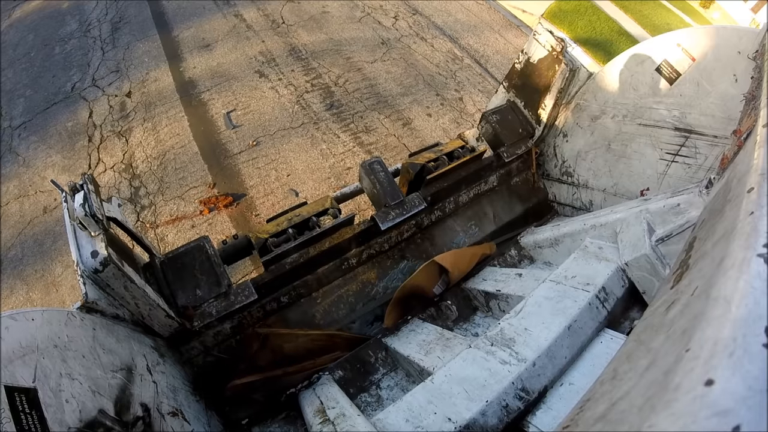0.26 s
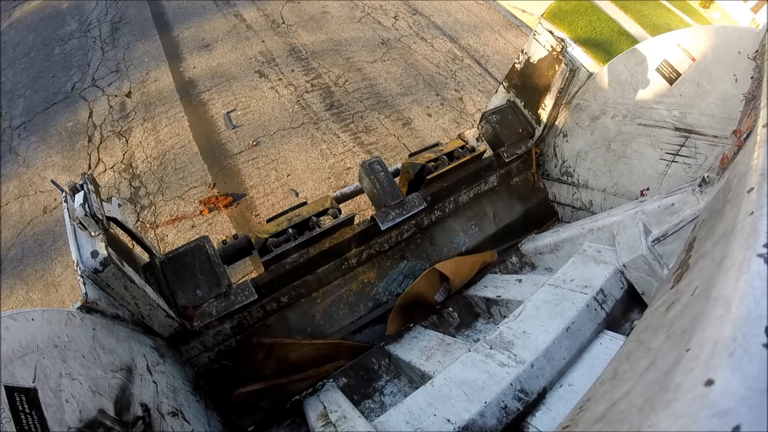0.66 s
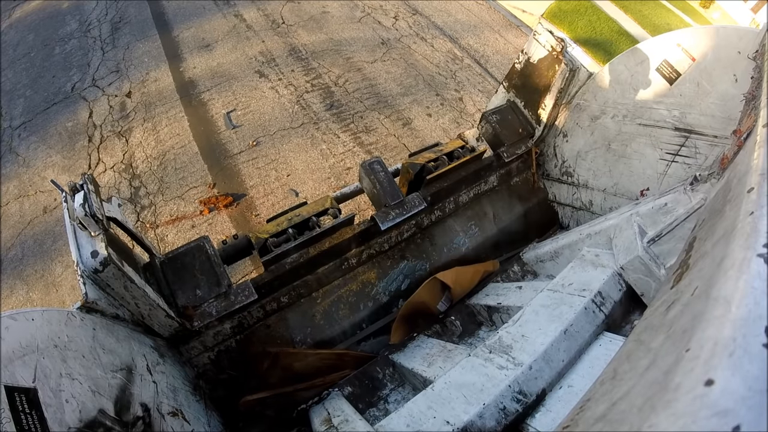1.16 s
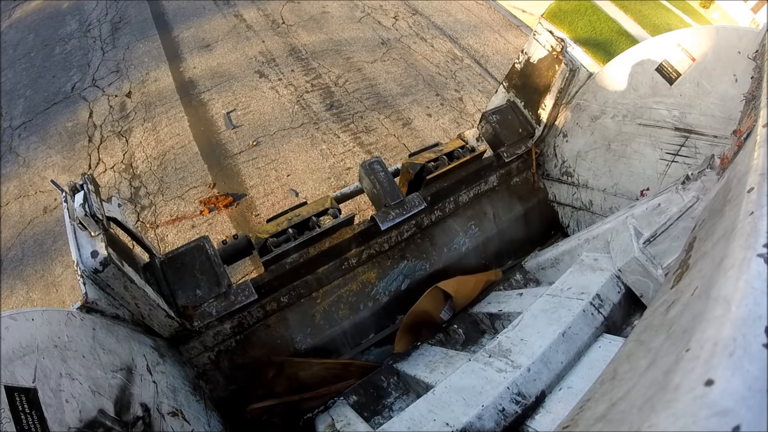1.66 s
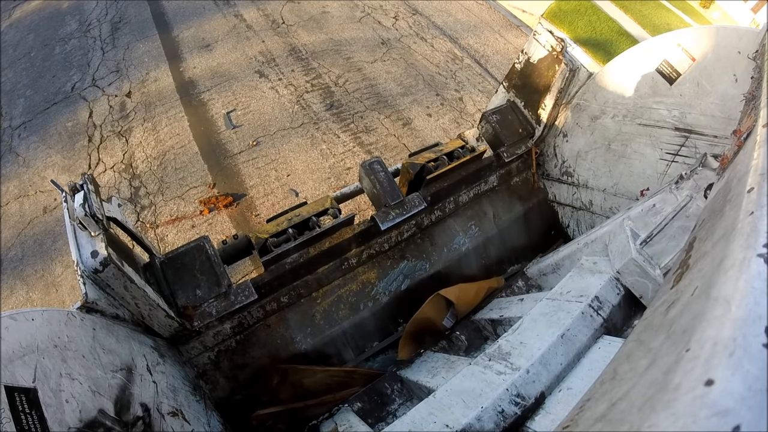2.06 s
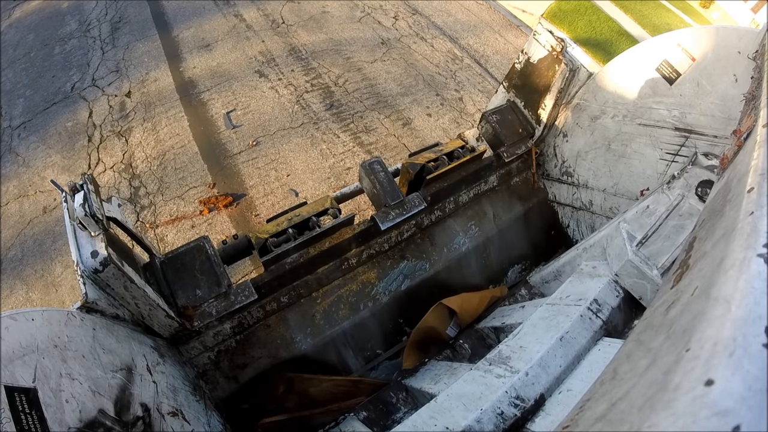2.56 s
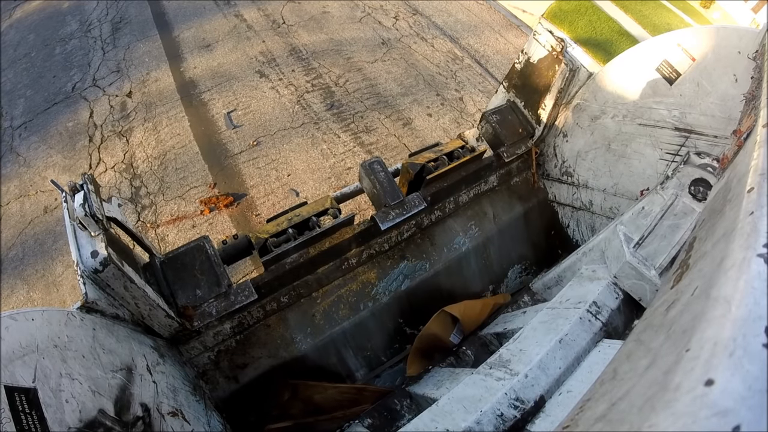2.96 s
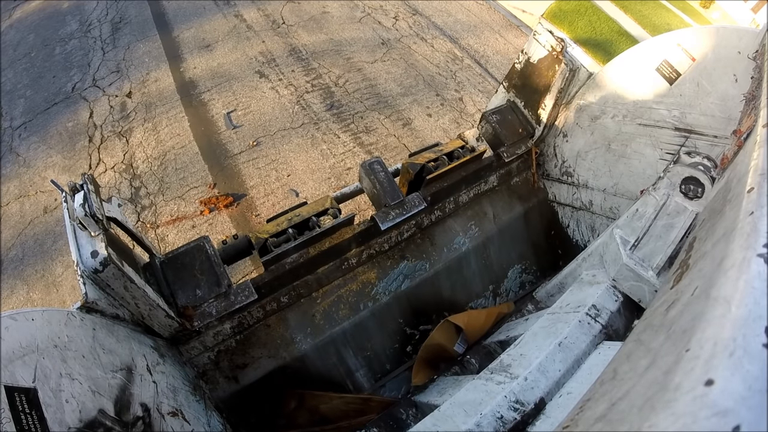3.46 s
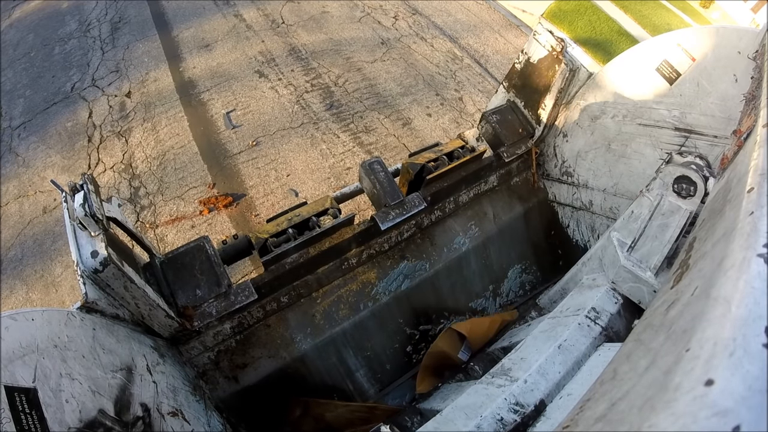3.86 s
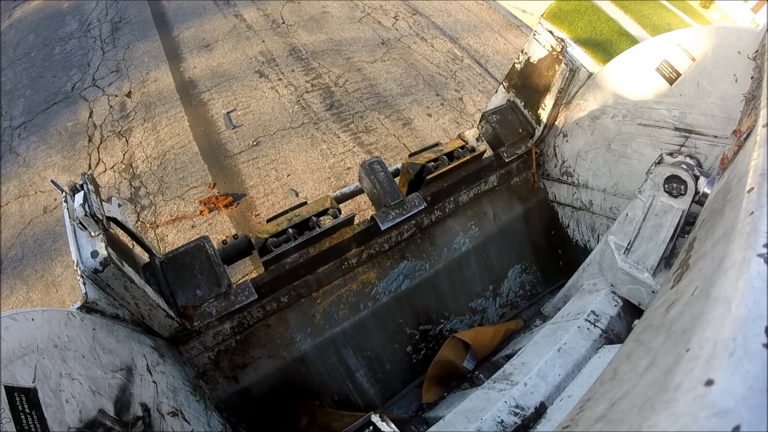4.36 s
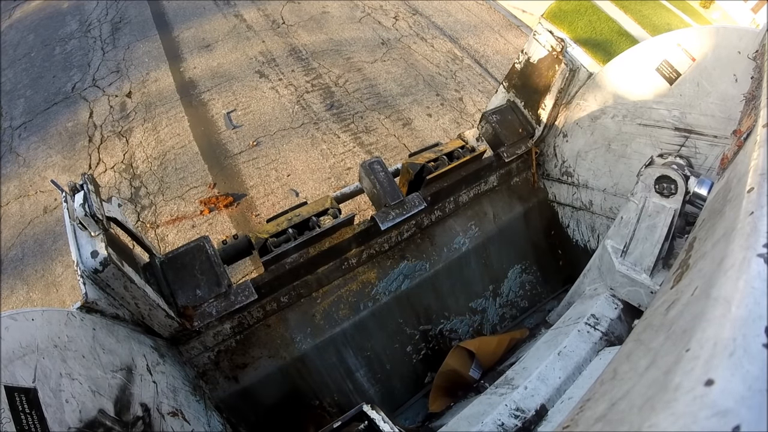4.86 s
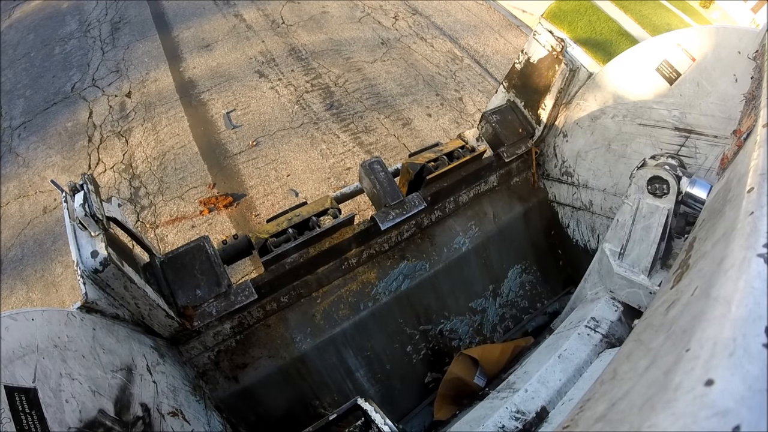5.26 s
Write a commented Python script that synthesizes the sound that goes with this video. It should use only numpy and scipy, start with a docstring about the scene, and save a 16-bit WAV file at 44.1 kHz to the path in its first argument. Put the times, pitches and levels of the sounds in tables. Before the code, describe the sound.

A garbage truck's packer blade drags wood and cardboard through its steel hopper, heard very close in mono. A loud, rough, high metallic whine, centred around 2 to 3 kHz, fills the whole five and a half seconds, gritty with fine crackle. From 0.1 to 1.1 seconds crunches come quickly: bright splinters snap around 0.3, boards crack around 0.4 to 0.8, and a short squeak sounds near 1.07. Crunches then space out, with a low groan around 2.25 and a strong crack and thud at 2.7. More cracking gathers from 3.5 to 3.7, with thudding breaks near 4.1, 4.7 and 4.9, and crunches continuing to the end. Grinding eases briefly around 0.75, 4.2 and 5.4. Beneath it a diesel rumbles, its deep boom swelling near the start, 2.2, 4.9 and 5.3, while a hydraulic pump hums steadily. Short, hard reflections give a metal-box resonance.

```python
"""Loud throughout is the high, rough whine of a steel hopper, rung by the load a packer blade drags across it.
Place: a garbage truck at work; distance and microphone: close, just above the hopper.
Wood and cardboard grind, crack and splinter: random tiny fractures ring through filters, in timed crunches.
A few gliding sines groan and squeak as the load sticks and slips on the steel.
Underneath, a diesel engine rumbles (filtered noise and tones) and a hydraulic pump hums at a steady speed."""
import sys
import numpy as np
from scipy import signal
from scipy.fft import rfft, irfft, next_fast_len
from scipy.io import wavfile
from scipy.ndimage import uniform_filter1d, minimum_filter1d, map_coordinates

SR = 44100
rng = np.random.default_rng(int(sys.argv[2]) if len(sys.argv) > 2 else 0)


def materialize(psi):
    """Save the field psi as 16-bit PCM at rate SR to the path in sys.argv[1].

    A 1-D psi becomes a single channel; in a 2-D psi each row is a channel.
    """
    bounded = np.clip(np.atleast_2d(psi).T, -1, 1)
    quanta = np.round(bounded * 32767).astype(np.int16)
    wavfile.write(sys.argv[1], SR, quanta)


N = 243431

# Small slips of the load: mean rate (1/s), centre level and half range (dB), length (s)
SLIPS_PER_S, SLIP_DB, SLIP_SCATTER_DB, SLIP_S = 8, -23, 0.5, 0.012


def small_slips(count=80):
    """Minor slips at uneven random intervals, as rows of (t/s, length/s, level/dB)."""
    gap, size = rng.random((count, 2)).T
    times = np.cumsum(2 * gap) / SLIPS_PER_S
    levels_db = SLIP_DB + SLIP_SCATTER_DB * (2 * size - 1)
    return [(s, SLIP_S, db) for s, db in zip(times, levels_db) if s < N / SR]


# How hard the blade drags the load over the hopper floor: t/s, grinding level/dB before trims
DRAG = [(0, -21), (.36, -18.5), (.75, -22), (1.8, -19), (2.45, -19), (3.0, -18.5), (4.0, -18),
        (4.22, -21.5), (4.5, -18), (5.25, -18), (5.4, -21.5)]
# The load gives way: t/s, length/s, then level/dB before layer gains of
# ringing steel, cracking wood, tearing fibres
CRUNCHES = [(0.107, 0.016, -14, -36, -40), (0.237, .06, -16, -26, -30.5), (0.315, .045, -16, -24, -23),
            (0.382, 0.03, -11.5, -32, -16), (0.423, 0.016, -21, -10.5, -13.5),
            (0.528, 0.088, -15, -11.5, -24.5), (0.748, 0.022, -39, -13.5, -31.5),
            (0.824, 0.017, -21, -11.5, -32.5), (0.985, 0.026, -15, -32, -31), (1.064, 0.029, -13, -15, -42),
            (1.341, 0.024, -13, -15, -27.5), (1.649, 0.021, -15.5, -34, -45),
            (1.829, 0.028, -14.5, -17, -40), (2.013, .04, -15.5, -31, -45), (2.084, 0.053, -14, -22.5, -29),
            (2.239, 0.044, -16.5, -32, -42.5), (2.316, 0.025, -16.5, -33, -27),
            (2.679, 0.018, -8.5, -13.5, -24.5), (2.953, 0.023, -10, -27, -38), (2.99, 0.024, -14, -32, -30),
            (3.1, .008, -11.5, -31, -42.5), (3.349, 0.0096, -27, -30, -21.5),
            (3.531, 0.029, -13, -15.5, -24.5), (3.587, 0.03, -16, -20.5, -25),
            (3.684, .02, -21.5, -8, -32.5), (3.716, 0.044, -15.5, -25, -32.5),
            (4.111, 0.044, -15, -16, -29), (4.322, .022, -13.5, -34, -23), (4.683, 0.047, -15, -10, -29.5),
            (4.86, 0.039, -16.5, -24, -39), (5.068, 0.018, -14.5, -34, -30),
            (5.135, 0.021, -13, -27, -33.5), (5.179, 0.039, -16, -28, -31), (5.43, .07, -14.5, -16, -31)]
# Resonances of the steel hopper: f/Hz, width/Hz, relative level/dB
HOPPER_MODES = [(850, 36, -18.5), (1030, 62, -25), (1521, 274, -19), (1863, 150, -14.5), (2305, 227, -9.5),
                (2432, 74, -7), (2695, 140, 0.5), (2840, 120, -3.5), (3000, 50, -6.5), (3065, 20, -10),
                (3197, 70, -15), (3608, 30, -14.5), (3752, 103, -19), (4090, 227, -25), (4980, 67, -37.5),
                (5840, 43, -30.5), (6170, 234, -34), (8250, 230, -46.5)]
# Colour of the fine crackle: f/Hz, relative level/dB
CRACKLE_SPECTRUM = [(3000, 6), (5200, 3), (6300, 10.5), (7500, -2.5), (8600, 4.5), (9800, -14.5),
                    (13000, -11), (14000, -23), (15000, -8)]
# Crackle level against the drag curve, and its random swing (dB)
CRACKLE_DB, CRACKLE_SWING_DB = -33, 4.5


def grinding(slips):
    """Dense stick-slip rings the hopper, harder in every crunch and slip; fine crackle rides on top."""
    grind_db, = curves(DRAG)
    sliding = amp(grind_db - 0.23 + 1.08 * wobble(55))
    rows = [(s, length, steel_db) for s, length, steel_db, _, _ in CRUNCHES] + slips
    judders = runs(rows, t60=0.084, fade_db=2.5, attack=0.006)

    ringing = ring(grains(rate=3500, spread_db=3), peaks(HOPPER_MODES, steep=1.703))
    ringing = walls(ringing, t60=0.17, wet_db=-9.5)
    ringing = even(patchy(ringing, depth_db=2), window=0.023)
    steel = np.hypot(sliding, judders) * ringing  # powers add

    crackle_gain = amp(grind_db + CRACKLE_DB + CRACKLE_SWING_DB * wobble(35))
    crackle = crackle_gain * ring(grains(rate=3200, spread_db=9.0), slope(CRACKLE_SPECTRUM))
    return steel + patchy(walls(crackle, t60=0.049, wet_db=-1.5), depth_db=4)


# Colour of cracking wood: f/Hz, relative level/dB
WOOD_SPECTRUM = [(150, -18), (500, 0), (640, -16), (850, 3), (1100, -5.5), (1450, 3.5), (2000, -0.5),
                 (3500, -4.5), (5000, -32), (12000, -56)]
# Boards thud against the blade and shake the body: t/s, length/s, level/dB before layer gains
THUDS = [(0.3, 0.023, -24), (0.42, 0.029, -33), (0.575, 0.042, -25), (0.829, .01, -21.5),
         (2.68, 0.022, -24), (3.54, 0.043, -25.5), (4.12, 0.065, -24), (4.88, .02, -25)]
# Colour of the thuds: f/Hz, relative level/dB
THUD_SPECTRUM = [(80, -30), (200, 8), (300, -2), (440, -2.5), (560, -11), (800, -22), (2000, -61)]


def breaking():
    """Boards crack softly under the drag and in a quick run at each crunch; some thud against the blade."""
    grind_db, = curves(DRAG)
    rows = [(s, length, wood_db) for s, length, _, wood_db, _ in CRUNCHES]
    cracks = runs(rows, t60=0.078, fade_db=6, attack=0.006)
    wood = ring(grains(rate=1700, spread_db=4.5), slope(WOOD_SPECTRUM))
    wood = even(walls(wood, t60=0.14, wet_db=-2.0), window=0.0066)
    cracking = np.hypot(amp(-10.5) * cracks, amp(grind_db - 17)) * wood

    thuds = runs(THUDS, t60=0.048, fade_db=12, attack=0.0019)
    blade = even(ring(grains(rate=1100, spread_db=19.0), slope(THUD_SPECTRUM)), window=0.012)
    return cracking + amp(-8.5) * thuds * blade


# Colour of tearing fibres: f/Hz, relative level/dB
FIBRE_SPECTRUM = [(1500, -25), (4000, 0), (5200, -3), (6400, 0), (7500, -5), (8600, -6), (10000, -13),
                  (13000, -16), (15000, -23)]
# Dry splinters snap off sharply: t/s, level/dB before the layer gain
SNAPS = [(0.318, -24), (0.338, -17.5), (0.555, -31), (2.315, -33.5), (3.534, -32)]
# Colour of the snaps: f/Hz, relative level/dB
SNAP_SPECTRUM = [(4000, -32), (8000, 10), (10500, 1.5), (13000, 2), (15000, -12)]
# Fibres let go unevenly within a tear: swing (dB), random knots a second
TEAR_SWING_DB, TEAR_CHANGES_PER_S = 2.5, 110
# Faint tear against its small slip, and faint snapping against its tear (dB, before layer gains)
SLIP_TEAR_DB, SNAP_IN_TEAR_DB = -13, -27


def splintering(slips):
    """Fibres tear in a ragged bright spray at each crunch, faintly at each slip, and splinters snap off."""
    rows = [(s, length, tear_db) for s, length, _, _, tear_db in CRUNCHES]
    rows += [(s, length, db + SLIP_TEAR_DB) for s, length, db in slips]
    raggedness = amp(TEAR_SWING_DB * wobble(TEAR_CHANGES_PER_S))
    tears = raggedness * runs(rows, t60=0.039, fade_db=6.5, attack=0.0063)
    fibres = ring(grains(rate=3200, spread_db=7.0), slope(FIBRE_SPECTRUM))
    fibres = even(patchy(fibres, depth_db=2), window=0.006)

    snaps = runs([(s, 0.01, db) for s, db in SNAPS], t60=0.035, fade_db=10.5, attack=0.0028)
    snapping = np.hypot(snaps, amp(SNAP_IN_TEAR_DB) * tears)
    shards = even(ring(grains(rate=4500, spread_db=8.5), slope(SNAP_SPECTRUM)), window=0.004)
    spray = amp(-11.0) * tears * fibres + amp(-7.5) * snapping * shards
    return walls(spray, t60=0.17, wet_db=-12.5)


# The load sticks and slips with a groan or a squeak: t/s, length/s, start f/Hz, end f/Hz,
# level/dB before the roughness
SQUEALS = [(0.745, 0.016, 1210, 1160, -28), (0.748, 0.025, 1480, 1450, -29), (0.82, 0.02, 1260, 1390, -27),
           (1.066, 0.042, 892, 850, -25), (1.067, 0.027, 2374, 2420, -11), (1.122, 0.145, 6000, 5900, -41),
           (2.254, 0.07, 457, 417, -25.5), (2.351, 0.095, 380, 324, -34.5), (4.689, .09, 873, 835, -28)]


def squealing():
    """Stick-slip on steel: brief, rough groans and squeaks, each gliding from one pitch to another."""
    t, out = np.arange(N) / SR, np.zeros(N)
    waver = 1 + 0.03 * wobble(700)
    roughness = amp(4.3 * wobble(180))
    for s, length, start_hz, end_hz, db in SQUEALS:
        glide_hz = np.interp(t, [s, s + length], [start_hz, end_hz])
        turns = np.cumsum(glide_hz * waver) / SR
        out += amp(db) * arch(s, length) * np.sin(2 * np.pi * turns)
    return out * roughness


# Pump harmonics: multiple of the pump frequency, level/dB against the hum
PUMP_ORDERS = [(1, -9.5), (2, -11.5), (3, -1), (4, -17.5), (5, -20)]
PUMP_HZ, HUM_DB = 178.25, -31.5


def pump():
    """The hydraulic pump's pressure ripple: a few clean harmonics that waver slightly."""
    turns = np.cumsum(PUMP_HZ * (1 + 0.0015 * wobble(7.6))) / SR
    hum = np.zeros(N)
    for multiple, db in PUMP_ORDERS:
        gain = amp(db + 1.24 * wobble(8))
        hum += gain * np.sin(2 * np.pi * (multiple * turns + rng.random()))
    return amp(HUM_DB) * hum


# Exhaust rumble: t/s, level/dB before a small random swing
EXHAUST = [(0, -29.5), (.6, -29.5), (.68, -33), (.85, -29), (1.12, -33.5), (2.0, -32.5), (2.27, -27),
           (2.55, -32.5), (3.15, -31.5), (3.9, -35.5), (4.7, -32.5), (5.3, -31)]
# Colour of the rumble: f/Hz, relative level/dB
RUMBLE_SPECTRUM = [(20, -31.5), (37, -22), (46, -22.5), (57, -0.5), (68, -3), (80, -6), (91, -4.5),
                   (104, -14.5), (128, -24.5), (200, -27.5), (400, -37), (900, -77)]
# Resonances of the truck body: f/Hz, width/Hz, relative level/dB
BODY_MODES = [(210.4, 21, -6), (334, 27, -27), (464, 34.3, 1), (517.1, 9.6, 4), (828, 53, -7)]
ENGINE_HZ, TONE_DB = 216.3, -38.5
# Steady drone of the body, and the drone a thud adds against that thud (dB)
DRONE_DB, SHAKE_DB = -34.5, -4


def engine():
    """Low exhaust rumble, a steady engine tone and the drone of the body, which swells at every thud."""
    rumble_db, = curves(EXHAUST)
    rumble = even(ring(rng.standard_normal(N), slope(RUMBLE_SPECTRUM)), window=0.11)
    rumble = amp(rumble_db + 1.2 * wobble(9)) * rumble

    turns = np.cumsum(ENGINE_HZ * (1 + 0.002 * wobble(6.42))) / SR
    tone = amp(TONE_DB + 1.8 * wobble(9)) * unit(np.sin(2 * np.pi * turns))

    steady = amp(DRONE_DB + 1.2 * wobble(5.14))
    shaken = amp(SHAKE_DB) * runs(THUDS, t60=0.2, fade_db=1, attack=0.01)
    body = even(ring(rng.standard_normal(N), peaks(BODY_MODES, steep=1.57)), window=0.3)
    return rumble + tone + np.hypot(steady, shaken) * body


# The exhaust boom swells: t/s, length/s, peak level/dB
BOOMS = [(0.06, 0.19, -24), (2.065, 0.29, -23.5), (4.82, 0.2, -22.5), (5.166, 0.25, -23.5)]


def booming():
    """The lowest exhaust note, one wavering sine, swells now and then."""
    boom_hz = 59.2
    turns = np.cumsum(boom_hz * (1 + 0.013 * wobble(10))) / SR
    swells = sum(amp(db) * arch(s, length) for s, length, db in BOOMS)
    return swells * np.sin(2 * np.pi * turns)


def walls(x, t60, wet_db):
    """Sound bounces between the steel walls of the hopper: x plus a decaying noise tail."""
    t = np.arange(SR // 3) / SR
    tail = rng.standard_normal(len(t)) * amp(-60 * t / t60)
    return x + amp(wet_db) * signal.fftconvolve(x, tail / np.linalg.norm(tail))[:N]


def grains(rate, spread_db):
    """Random tiny fractures of uneven size, rate a second on average, at rms 1."""
    hits = rng.random(N) < rate / SR
    signs = rng.choice([-1, 1], N)
    sizes = amp(spread_db * rng.standard_normal(N).clip(-2, 2))
    return unit(hits * signs * sizes)


def runs(rows, t60, fade_db, attack):
    """Strength of fracturing: each (t/s, length/s, level/dB) builds up, fades and then dies away."""
    power = np.zeros(N + SR)
    t = np.arange(SR // 5) / SR  # each run is cut off after 0.2 s
    for s, length, db in rows:
        length = max(length, 1 / SR)
        fade = fade_db * np.minimum(t / length, 1)
        decay = 60 * np.maximum(t - length, 0) / t60
        shape = np.minimum(t / attack, 1) * amp(db - fade - decay)
        power[max(round(s * SR), 0):][:len(t)] += shape ** 2
    return np.sqrt(power[:N])


def arch(s, length):
    """A smooth half-sine rise and fall that starts at s and lasts length (s)."""
    return np.sin(np.pi * np.clip((np.arange(N) / SR - s) / length, 0, 1))


def patchy(x, depth_db):
    """Uneven colour of the fragments: a gain that drifts at random over time and frequency."""
    z = signal.stft(x, nperseg=256)[2]
    field = uniform_filter1d(rng.standard_normal(z.shape), size=5, axis=0)  # along frequency
    field = uniform_filter1d(field, size=9, axis=1)  # along time
    return signal.istft(z * amp(depth_db * unit(field)), nperseg=256)[1][:N]


def even(x, window):
    """x at rms 1 with its swells slower than the window (s) largely levelled out."""
    size = max(int(window * SR), 2)
    power = uniform_filter1d(uniform_filter1d(x * x, size), size)
    return unit(x / np.sqrt(np.abs(power) + 0.45 * np.mean(x * x)))


def ring(x, gain, size=16384):
    """x through the causal minimum-phase filter of unit energy whose response has this shape."""
    cepstrum = irfft(np.log(gain(np.fft.rfftfreq(size, 1 / SR)) + 1e-6))
    cepstrum[1:size // 2] *= 2  # fold onto positive times
    cepstrum[size // 2 + 1:] = 0
    response = irfft(np.exp(rfft(cepstrum)))
    return signal.fftconvolve(x, response / np.linalg.norm(response))[:N]


def peaks(modes, steep):
    """Gain of frequency of a set of resonances whose skirts fall with the given steepness."""
    def gain(hz):
        power = 0
        for centre, width, db in modes:
            detuning = (hz * hz - centre * centre) / (width * hz + 1)
            power = power + amp(db) ** 2 / (1 + detuning ** 2 / steep) ** steep
        return np.sqrt(power)
    return gain


def slope(points):
    """Gain of frequency through (f/Hz, level/dB) points on a log axis."""
    f, db = np.transpose(points)
    return lambda hz: amp(np.interp(np.log(hz + 1), np.log(f), db))


def curves(rows):
    """One value per sample for each column after the time."""
    s, *columns = np.transpose(rows)
    return [np.interp(np.arange(N) / SR, s, column) for column in columns]


def wobble(rate):
    """A smooth random curve, rate knots a second."""
    knots = rng.standard_normal(int(N * rate / SR) + 4)
    return map_coordinates(knots, [np.arange(N) * rate / SR])


def amp(db):
    """Decibels to gain."""
    return 10 ** (np.asarray(db) / 20)


def unit(x):
    """x at rms 1."""
    return x / np.sqrt(np.mean(x ** 2) + 1e-20)


def scene():
    """The load in the hopper and the truck underneath, in one channel."""
    slips = small_slips()
    load = grinding(slips) + breaking() + splintering(slips) + squealing()
    truck = pump() + engine() + booming()
    return (load + truck)[None]


# The microphone's top end: f/Hz, level/dB
MICROPHONE = [(13200, 0), (14000, -6), (15300, -6)]
TOP_HZ = 15300  # band limit


def record(dry):
    """A limiter holds down the loudest peaks, the microphone dulls the top, and a band limit cuts the rest."""
    ceiling = 0.86  # of full scale, ahead of the microphone filter
    needed = ceiling / np.maximum(np.abs(dry), ceiling)
    held = dry * uniform_filter1d(minimum_filter1d(needed, size=181), size=181)
    size = next_fast_len(N + SR // 2)
    hz = np.fft.rfftfreq(size, 1 / SR)
    response = slope(MICROPHONE)(hz) * (hz < TOP_HZ)
    return irfft(rfft(held, size) * response, size)[..., :N]


dry = scene()
out = record(dry)
materialize(out)
```